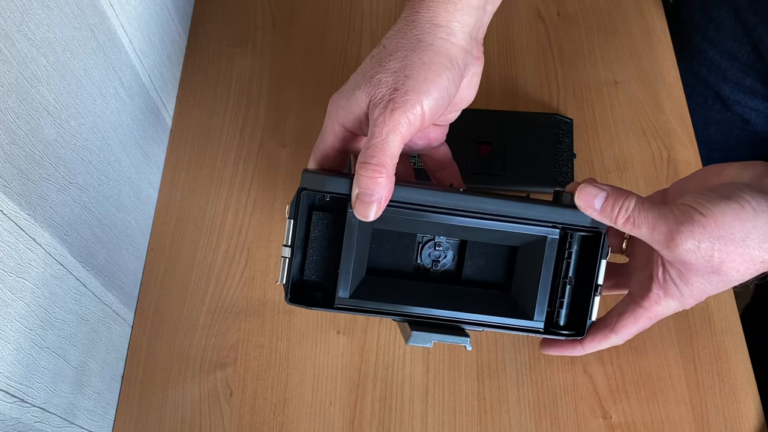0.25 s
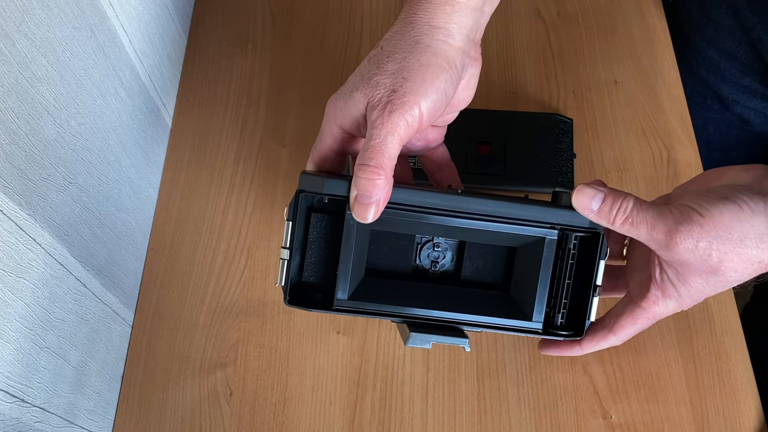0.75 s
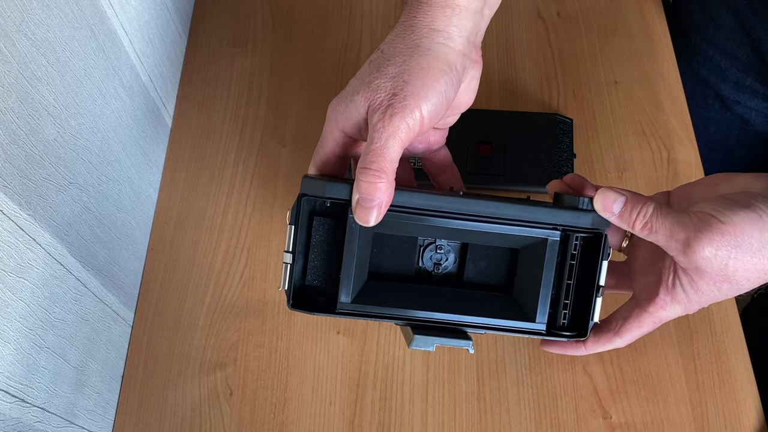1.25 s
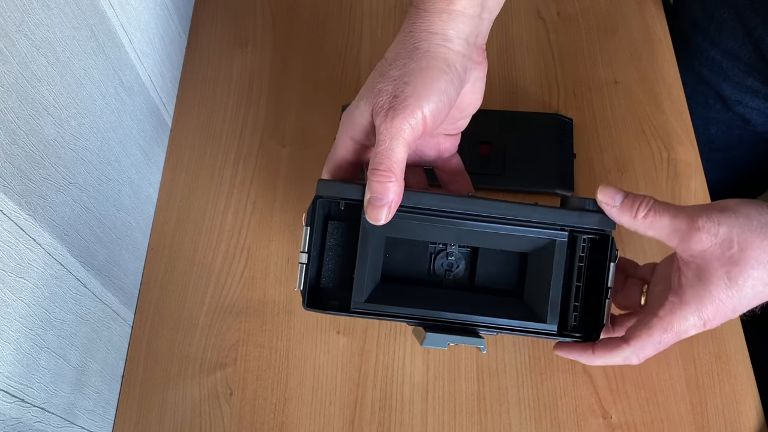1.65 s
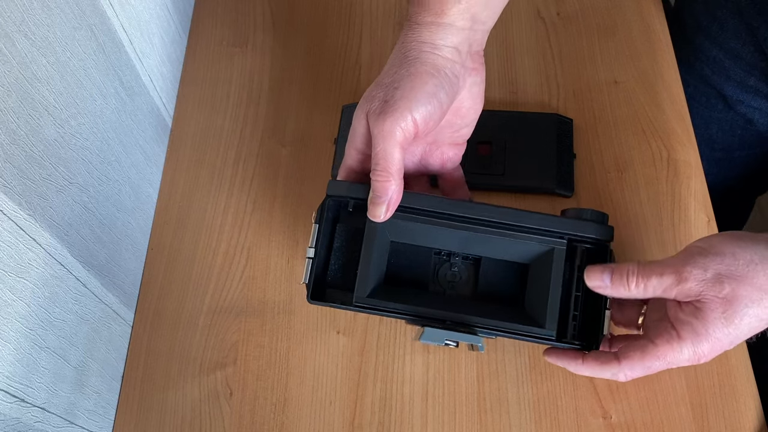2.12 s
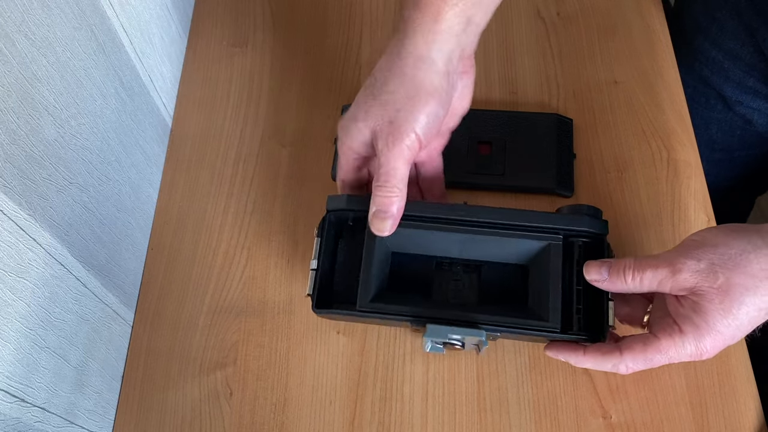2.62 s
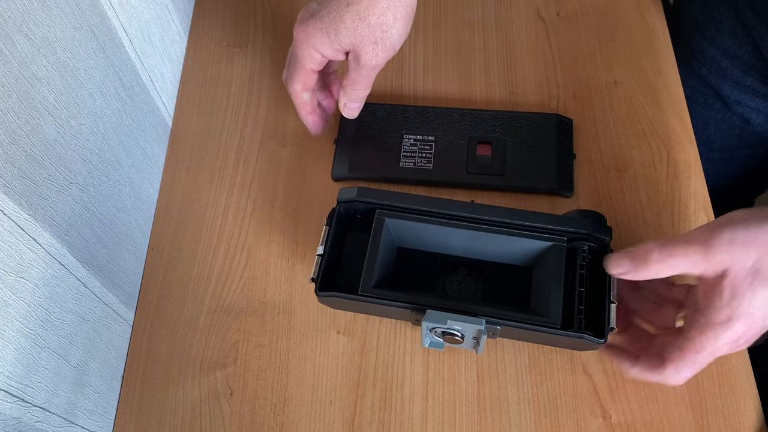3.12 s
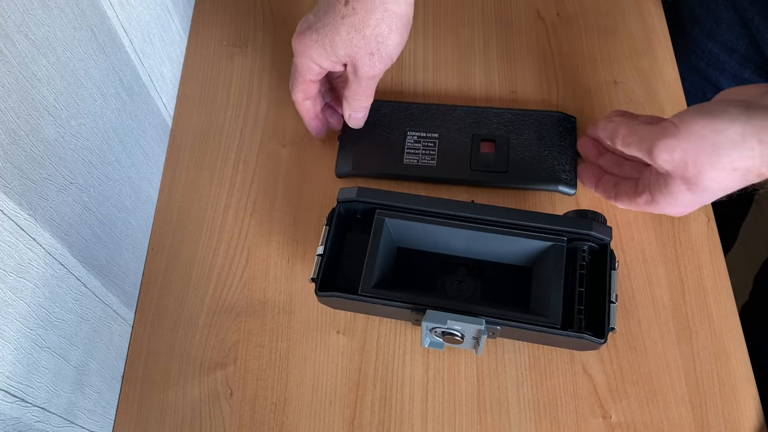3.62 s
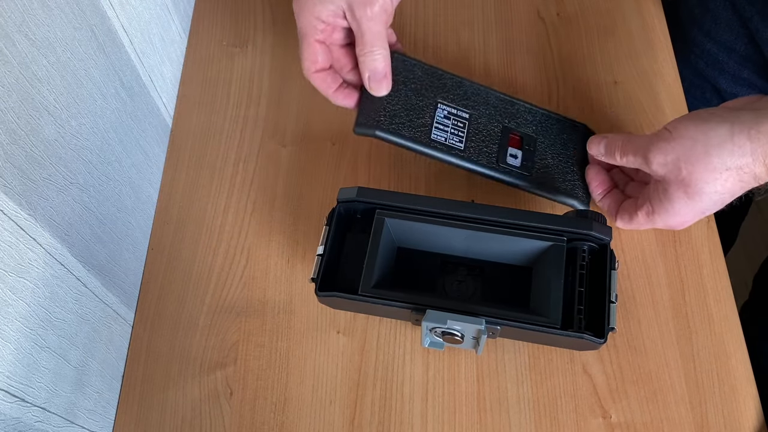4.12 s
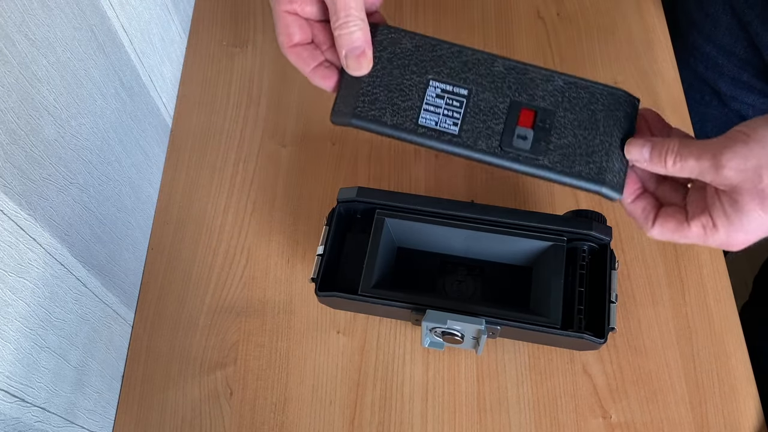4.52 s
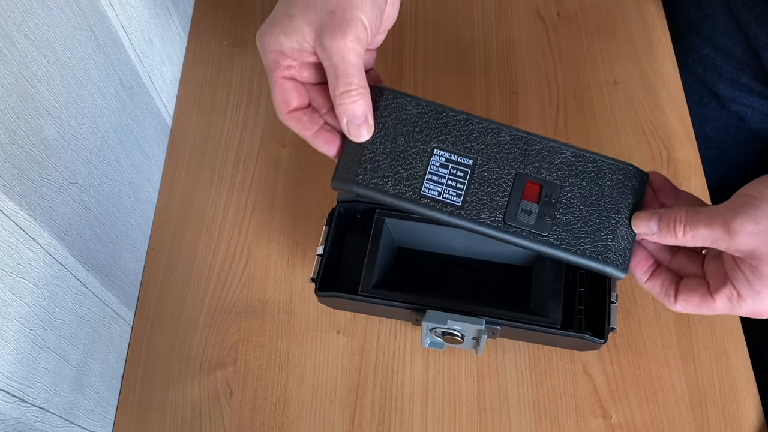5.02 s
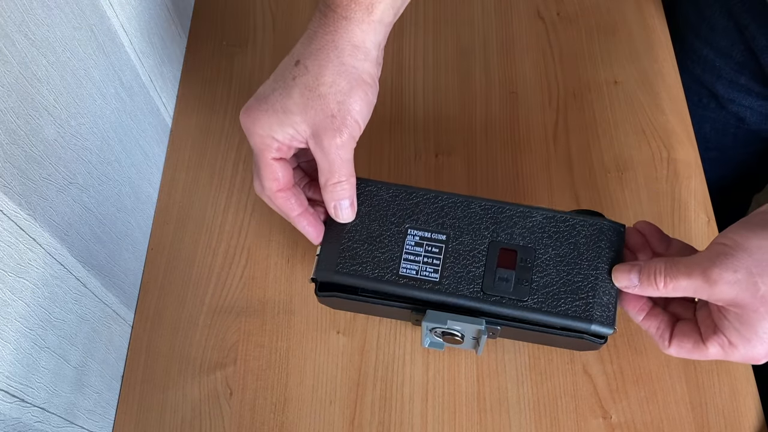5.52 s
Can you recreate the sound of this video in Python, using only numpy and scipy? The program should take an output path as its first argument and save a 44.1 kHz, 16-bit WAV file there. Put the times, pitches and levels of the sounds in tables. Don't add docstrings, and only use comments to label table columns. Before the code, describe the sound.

A film winding wheel snaps seven crisp ratchet clicks, then a small plastic camera thumps onto wood and its loose back slides and knocks.

```python
import sys
import numpy as np
from scipy import signal
from scipy.fft import rfft, irfft
from scipy.io import wavfile
from scipy.ndimage import uniform_filter1d

SR = 44100
rng = np.random.default_rng(int(sys.argv[2]) if len(sys.argv) > 2 else 0)


def natural_amplitude(level_db):
    exponent = np.asarray(level_db, float) / 20
    return 10 ** exponent


def to_wav(s):
    ch = np.atleast_2d(s).T
    pcm = np.round(np.clip(ch, -1, 1) * 32767)
    wavfile.write(sys.argv[1], SR, pcm.astype(np.int16))


N = 254180
SECONDS = np.arange(N) / SR


def ratchet():
    # [t/s, snap peak/dB, shell above it/dB]
    pawl_drops = [
        (0.2749, -21.5, -12.5),
        (0.3489, -19, -14),
        (0.4202, -20.5, -16),
        (0.8991, -21, -10),
        (1.0149, -18, -13.5),
        (1.108, -20, -9.5),
        (1.1931, -22, -6),
    ]
    # [f/Hz, level/dB, t60/s]
    spring_modes = [(4200, -8, 0.01), (5080, -3.5, 0.0058), (7310, -4, 0.019), (9500, -11, 0.0058),
                    (11030, -3, .006), (12000, -27, 0.0061), (14200, 10, 0.003), (15730, 12.5, 0.0066),
                    (15550, -9.5, 0.0066)]
    # [f/Hz, level/dB, t60/s]
    shell_modes = [(680, -7, 0.045), (1010, -7, 0.14), (1250, -6.5, 0.065), (1560, -12, 0.0092),
                   (1920, -13, 0.043), (2300, 3, 0.046), (2675, -6.5, 0.023), (3030, -0.5, 0.016),
                   (3320, -7.5, 0.0087)]
    # [f/Hz, level per Hz/dB]
    snap_spectrum = [(290, -12.5), (500, -15.5), (986, -6.5), (2000, -5.5), (2320, -4.5), (3260, -9),
                     (6330, -8.5), (7330, -6), (8250, -9.5), (11800, -3), (13400, -2), (15100, 7),
                     (16500, -23.5)]
    snap_ms = 0.704
    s, snap_db, shell_db = np.transpose(pawl_drops)
    snaps = [rattle(0.407, snap_ms) * natural_amplitude(db) for db in snap_db]
    cracks = [rattle(0.587, snap_ms) * natural_amplitude(db) for db in snap_db]
    crack = natural_amplitude(5.0) * shaped(laid(s, cracks), snap_spectrum)
    spring = natural_amplitude(-23) * strike(s, snaps, spring_modes, spread_db=3)
    knocks = [snap * natural_amplitude(db) for snap, db in zip(snaps, shell_db)]
    shell = natural_amplitude(-24) * strike(s + 0.0008, knocks, shell_modes, spread_db=2)
    return crack + spring + shell


def creaks():
    # [t/s, f/Hz, level/dB, length/ms]
    wheel_creaks = [(0.327, 1070, -63, 5.7), (.41, 2300, -63, 8.8), (.43, 680, -63, 6.9),
                    (.936, 1010, -58, 5.6), (0.988, 1010, -61.5, 5.9), (0.987, 2300, -60, 7.8),
                    (1.08, 2100, -63.5, 14), (1.125, 2300, -70, 13), (1.144, 2300, -46.5, 7.9),
                    (1.16, 1250, -64, 4.5), (1.172, 1950, -63, 6), (1.18, 2300, -47, 10)]
    # [t/s, f/Hz, level/dB, length/ms]
    back_flexes = [
        (3.508, 1540, -61.5, 38),
        (3.547, 1560, -57.5, 22),
        (3.727, 1120, -60, 17),
        (3.73, 1670, -57, 12),
        (4.147, 1480, -60.5, 9.3),
        (4.152, 3200, -62, 9.5),
        (4.165, 1960, -55.5, 2.8),
        (4.179, 1070, -65, 12),
        (4.365, 4830, -79, 24),
        (5.376, 5000, -78, 10),
    ]
    rows = wheel_creaks + back_flexes
    slips = [ring(rattle(2.77, ms), hz, 30 / hz) * natural_amplitude(db - 6.5) for _, hz, db, ms in rows]
    return laid(np.array(rows)[:, 0], slips)


def back():
    # [t/s, peak/dB, rattle/ms]
    blow_rows = [
        (3.709, -43, 2),
        (3.7215, -36, 1.4),
        (3.8054, -32, 1.1),
        (3.831, -28.5, 3.6),
        (3.846, -36, 2.7),
        (3.861, -38.5, 2.5),
        (3.993, -70, 1.1),
    ]
    # [f/Hz, level/dB, t60/s]
    back_modes = [(678, -28, 0.31), (777, -22, 0.46), (1120, -26, 0.45), (1219, -8.5, 0.12),
                  (1636, 3, 0.044), (1610, -10.5, 0.18), (1676, 0, 0.11), (1730, -22, 0.044),
                  (1994, -14, 0.14), (2140, -4, 0.095), (2290, -16, 0.055), (3200, -10.5, 0.062),
                  (3584, -5.5, 0.04), (1400, -29, 0.08)]
    # [f/Hz, level per Hz/dB]
    crash_spectrum = [(500, -50), (900, -28), (1700, 6), (2800, 14), (4200, 9), (7000, -2), (11000, -7),
                      (15500, -20), (16300, -45)]
    # [fastest t/s, ring level/dB, low drag level/dB, swell/ms, fade/ms]
    slide_rows = [
        (3.558, -49, -52.5, 56, 58),
        (3.65, -82, -70, 20, 27),
        (4.043, -60.5, -71.5, 100, 41),
        (4.164, -54.5, -73.5, 35, 35),
    ]
    s, peak_db, length_ms = np.transpose(blow_rows)
    blows = [rattle(0.7, ms) * natural_amplitude(db) for db, ms in zip(peak_db, length_ms)]
    knocks = natural_amplitude(-21) * strike(s, blows, back_modes, spread_db=2, sense=1)
    edges = [rattle(0.76, 2 * ms) * natural_amplitude(db) for db, ms in zip(peak_db, length_ms)]
    crack = natural_amplitude(-7) * shaped(laid(s, edges), crash_spectrum)

    s, ring_db, low_db, swell_ms, fade_ms = np.transpose(slide_rows)
    ringing = strokes(s, ring_db, swell_ms, fade_ms)
    lead_s = 0.017
    low = strokes(s - lead_s, low_db, 1.76 * swell_ms, 1.65 * fade_ms)
    drag = grains(5000, spread_db=2)
    shell = sum(ring(drag * natural_amplitude(db), hz, 0.6 * t60) for hz, db, t60 in back_modes)
    wood = sum(ring(drag, hz, t60) for hz, t60 in [(150, 0.15), (230, 0.14), (310, 0.11)])
    return knocks + crack + ringing * rms_one(shell), low * rms_one(wood) * natural_amplitude(3.5)


def table():
    # [t/s, peak/dB, push/ms]
    thumps = [
        (2.329, -28.5, 5.3),
        (2.699, -32.5, 7.2),
        (2.742, -40.5, 3.2),
        (2.772, -37.5, 4.7),
        (2.822, -36.5, 3.6),
        (5.64, -56, 4.5),
    ]
    # [f/Hz, level/dB, t60/s]
    top_modes = [(93, -13.5, 0.64), (134.8, -13.5, 0.46), (153.8, 1.5, 0.51), (170.5, 1.5, 0.45),
                 (187.7, -3.5, 0.57), (220, -3.5, 0.18)]
    # [t/s, peak/dB, push/ms]
    rim_drops = [
        (3.713, -50.5, 4.9),
        (3.806, -52.5, 2.2),
        (3.834, -37.5, 2.8),
    ]
    # [f/Hz, level/dB, t60/s]
    rim_modes = [(158.7, 0.5, 0.52), (210, 3, .12)]
    out = 0
    for rows, modes, sense in [(thumps, top_modes, -1), (rim_drops, rim_modes, 1)]:
        pushes = []
        for _, db, ms in rows:
            push = np.hanning(round(ms * SR / 1000))
            pushes.append(push * natural_amplitude(db) / (ms * SR / 2000))
        out = out + strike(np.array(rows)[:, 0], pushes, modes, spread_db=1, sense=sense)
    return out


def touches():
    # [t/s, peak/dB, centre f/Hz, length/ms]
    brushes = [
        (1.405, -54.5, 2310, 11),
        (1.488, -52, 1490, 26),
        (1.495, -54.5, 2230, 57),
        (1.575, -56, 2300, 8),
        (1.655, -55.5, 2040, 11),
        (2.424, -54.5, 500, 10.4),
        (3.337, -46.5, 1000, 10),
        (5.643, -54.5, 1980, 8),
        (5.687, -58, 1900, 6.27),
        (2.45, -61, 2430, 33),
    ]
    # [t/s, peak/dB]
    unsticks = [
        (1.378, -73),
        (1.995, -67),
        (2.381, -60),
        (2.394, -54.5),
        (2.41, -63),
        (2.425, -60),
        (2.439, -61),
        (2.48, -65),
        (3.337, -57),
    ]
    # [t/s, peak/dB, length/ms]
    pats = [
        (1.109, -50, 4.3),
        (3.171, -49, 31.6),
        (3.341, -44, 9),
        (3.372, -53, 8.3),
        (3.433, -53, 36),
        (3.691, -48, 15),
        (3.718, -45, 10),
    ]
    # [t/s, peak/dB]
    corners = [
        (2.337, -51),
        (2.707, -45),
        (2.778, -51.5),
    ]
    # [f/Hz, level/dB, length/ms]
    corner_tones = [(1540, -5, 8.7), (1000, -2, 6.2), (500, -6, 8.2)]
    rows = brushes + [(s, db, 5830, 1.5) for s, db in unsticks] + [(s, db, 231, ms) for s, db, ms in pats]
    rows = rows + [(s, db + tone_db, hz, ms) for s, db in corners for hz, tone_db, ms in corner_tones]
    bursts = []
    for _, db, hz, ms in rows:
        hollow = signal.iirpeak(hz, 1.3, SR)
        dull = signal.lfilter(*hollow, signal.lfilter(*hollow, rattle(0.587, ms)))
        bursts.append(dull / np.abs(dull).max() * natural_amplitude(db + 1.0))
    return laid(np.array(rows)[:, 0], bursts)


def rubbing():
    # [fastest t/s, level/dB, swell/ms, fade/ms]
    rubs = [(1.51, -74, 58, 140), (2.15, -83, 27, 57), (2.39, -92, 60, 98), (2.71, -73, 44, 42),
            (3.558, -74, 110, 70), (3.734, -65.5, 23, 57), (3.88, -62, 40, 61), (4.048, -64, 62, 35),
            (4.158, -66.5, 83, 24), (4.52, -68, 31, 18), (4.64, -93, 64, 110), (5.095, -76.5, 70, 52),
            (5.28, -83, 88, 77), (5.385, -85.5, 66, 72), (5.5, -96, 37, 40)]
    # [f/Hz, level per Hz/dB]
    skin_spectrum = [(900, -26), (2000, -11), (5000, 3), (9000, 6.5), (12000, 4), (15500, 4.5),
                     (16000, -17)]
    return strokes(*np.transpose(rubs)) * coloured(skin_spectrum, grains(6500, spread_db=4.5))


def room(x):
    # [f/Hz, t60/s]
    room_t60 = [(100, 0.8), (500, 0.52), (1500, 0.37), (4000, 0.35), (8000, 0.26), (15000, 0.17)]
    t = np.arange(SR // 2) / SR
    edges = 70 * 2 ** np.arange(0, 8.1, 0.5)
    reply = 0
    for low, high in zip(edges, edges[1:]):
        half_octave = signal.butter(2, [low, high], "band", fs=SR, output="sos")
        band = signal.sosfilt(half_octave, rng.standard_normal((2, len(t))))
        reply = reply + band * natural_amplitude(-60 * t / at_hz(room_t60, np.sqrt(low * high)))
    early = natural_amplitude(5.5) * np.exp(-t * 1000 / 7.5)
    onset = np.clip((t - 0.0006) / 0.00048, 0, 1)
    reply = reply * onset * (1 + early) * natural_amplitude([[-36], [-35]])
    reply = signal.sosfilt(signal.cheby2(8, 40, 16300, fs=SR, output="sos"), reply)
    wall_ms, wall_db = 8, -16
    reply[0, round(wall_ms * SR / 1000)] += natural_amplitude(wall_db)
    return signal.fftconvolve(x[None], reply, axes=1)[:, :N]


def moving_room(x, count):
    shift_s = 0.085
    turn = [np.clip(1 - np.abs((SECONDS / shift_s - k) % count - 1), 0, 1) for k in range(count)]
    return sum(room(x * share) for share in turn)


def ports(mid):
    # [f/Hz, width/Hz, depth 0-1]
    port_dips = [(8500, 700, .88), (13400, 1000, .96)]
    for hz, width_hz, depth in port_dips:
        mid = mid - depth * signal.lfilter(*signal.iirpeak(hz, hz / width_hz, SR), mid)
    return mid


def air():
    # [f/Hz, level per Hz/dB]
    air_spectrum = [(3.5, -40), (6.0, 2), (18, -2), (28, -7), (44, -19.5), (74, -19), (103, -27),
                    (345, -37.5), (393, -38.5), (642, -38.5), (834, -41), (2370, -43), (3080, -46),
                    (14800, -61.5)]
    # [f/Hz, level relative to mid/dB]
    air_side = [(60, -38), (110, -28), (200, -20), (380, -13.5), (700, -17), (1290, -14), (2380, -38),
                (4400, -26), (8120, -26), (15000, -8)]
    # [f/Hz, width/Hz, level/dB]
    hum_tones = [(637, 40, -78), (2286, 150, -83)]
    mid = natural_amplitude(-50.5) * coloured(air_spectrum, rng.standard_normal(N))
    for hz, width_hz, db in hum_tones:
        hum = signal.lfilter(*signal.iirpeak(hz, hz / width_hz, SR), rng.standard_normal(N))
        mid = mid + natural_amplitude(db) * rms_one(hum)
    mid = signal.sosfilt(signal.cheby2(10, 30, 15000, fs=SR, output="sos"), mid)
    any_phase = np.exp(2j * np.pi * rng.random(N // 2 + 1))
    return np.array([mid, shaped(mid, air_side, turn=any_phase)])


def ring(force, hz, t60):
    r, w = natural_amplitude(-60 / (t60 * SR)), 2 * np.pi * hz / SR
    return signal.lfilter([0, np.sin(w)], [1, -2 * r * np.cos(w), r * r], force + 1e-18)


def strike(times, pulses, modes, spread_db, sense=-1):
    luck = rng.standard_normal((len(times), 32))
    out = 0
    for k, (hz, level_db, t60) in enumerate(modes):
        gain = sense ** k * natural_amplitude(level_db + spread_db * luck[:, k])
        force = laid(times, [pulse * g for pulse, g in zip(pulses, gain)])
        out = out + ring(force, hz, t60)
    return out


def rattle(rise_ms, length_ms):
    ms = np.arange(4096) * 1000 / SR
    swell = np.minimum(ms / rise_ms, 1) ** 2 * np.exp(-np.maximum(ms - rise_ms, 0) / length_ms)
    burst = rng.standard_normal(len(ms)) * swell
    for _ in range(6):
        even = irfft(np.exp(1j * np.angle(rfft(burst))))
        burst = even / np.sqrt(np.abs(uniform_filter1d(even ** 2, size=24)) + 1e-12) * swell
    return burst


def grains(per_s, spread_db):
    sizes = natural_amplitude(spread_db * np.minimum(rng.exponential(1, N), 4)) * rng.choice([-1, 1], N)
    return sizes * (rng.random(N) < per_s / SR)


def strokes(times, levels_db, swells_ms, fades_ms):
    drop_db = 20
    coarse = SECONDS[::32]
    ms = (coarse[:, None] - times) * 1000
    away = np.hypot(np.where(ms < 0, ms / swells_ms, ms / fades_ms), 0.15) - 0.15
    return np.interp(SECONDS, coarse, natural_amplitude(levels_db - drop_db * away).sum(axis=1))


def laid(times, pulses):
    out = np.zeros(N + SR)
    for s, pulse in zip(times, pulses):
        out[round(s * SR):][:len(pulse)] += pulse
    return out[:N]


def at_hz(points, hz):
    table_hz, values = np.array(points)[:, 0], np.array(points)[:, 1]
    return np.interp(np.log(hz), np.log(table_hz), values)


def shaped(x, spectrum, turn=1):
    hz = np.maximum(np.fft.rfftfreq(N, 1 / SR), 1)
    return irfft(turn * rfft(x) * natural_amplitude(at_hz(spectrum, hz)), N)


def coloured(spectrum, white):
    return rms_one(shaped(white, spectrum))


def rms_one(x):
    return x / np.sqrt(np.mean(x ** 2) + 1e-20)


def scene():
    # [f/Hz, level/dB]
    near_side = [(60, -23.5), (200, -17), (500, -4.5), (1500, -4), (4000, -5.5), (8500, -3), (10000, 1.5),
                 (10900, -27), (11800, -18), (13500, 11.5), (15000, -17.5), (15600, -14), (17000, -28)]
    cover, wood = back()
    plastic_band = signal.butter(3, [300, 15900], "band", fs=SR, output="sos")
    plastic = signal.sosfilt(plastic_band, ratchet() + creaks() + cover) + touches() + rubbing()
    panel = table() + wood
    near = plastic + panel
    echo = moving_room(plastic, count=3)
    side = shaped(near + echo[1], near_side, turn=1j)
    side = side + 0.17 * cover - 0.088 * panel
    both = np.array([ports(near + echo[0]), side]) + air()
    mid, side = signal.sosfilt(signal.cheby2(12, 60, 17300, fs=SR, output="sos"), both)
    return np.array([mid + side, mid - side])


def band_limit(x):
    return signal.sosfilt(signal.butter(12, 17160, fs=SR, output="sos"), x)


def record(dry):
    return band_limit(dry)


dry = scene()
out = record(dry)
to_wav(out)
```